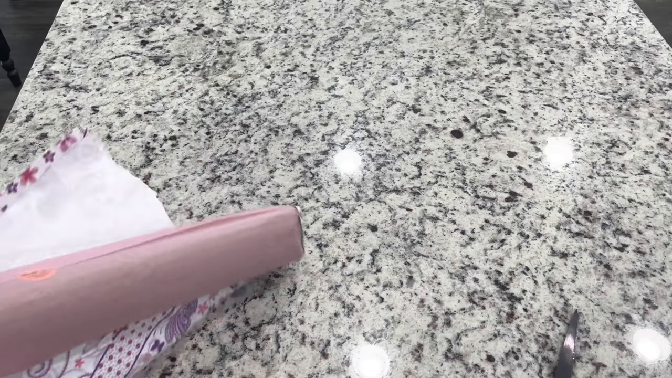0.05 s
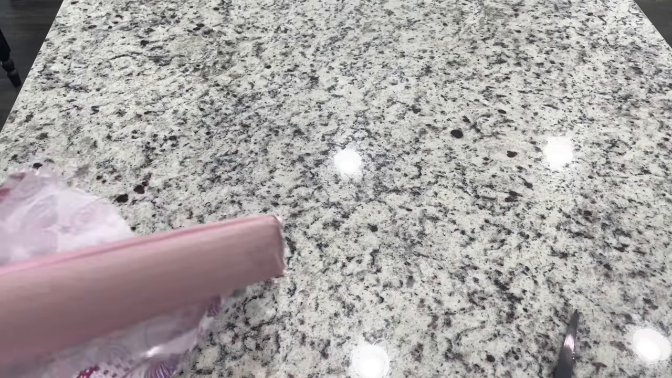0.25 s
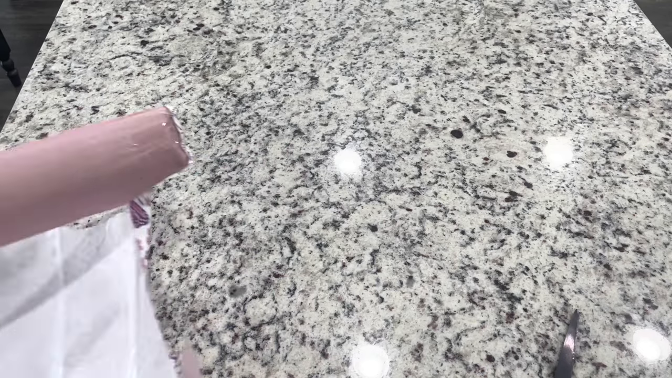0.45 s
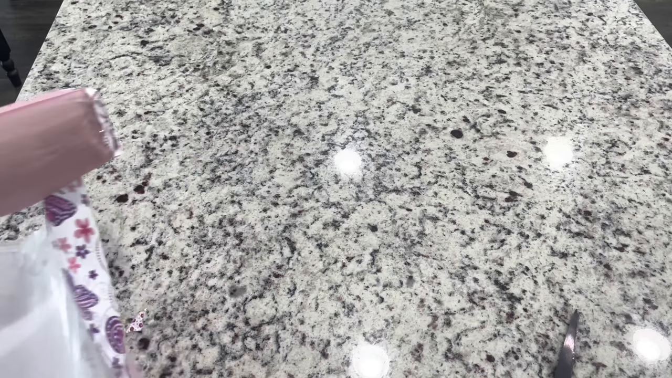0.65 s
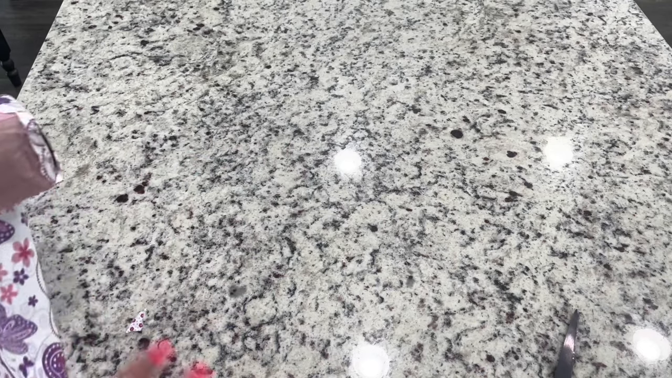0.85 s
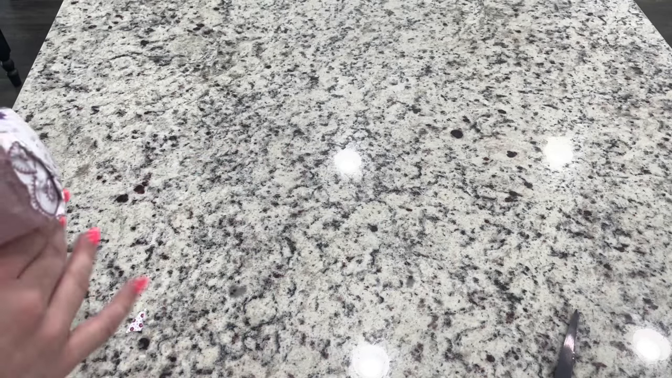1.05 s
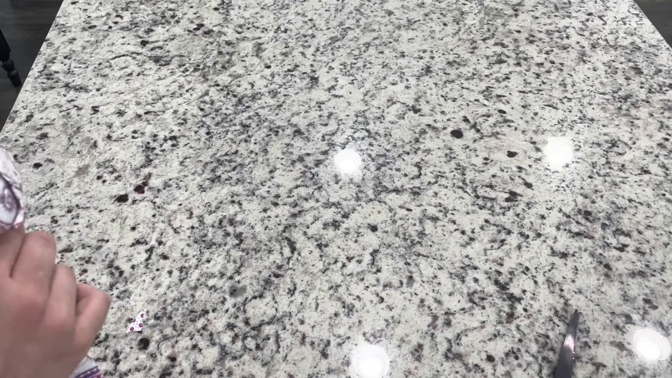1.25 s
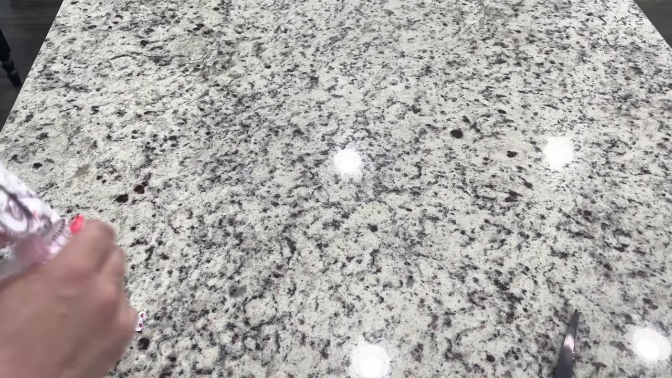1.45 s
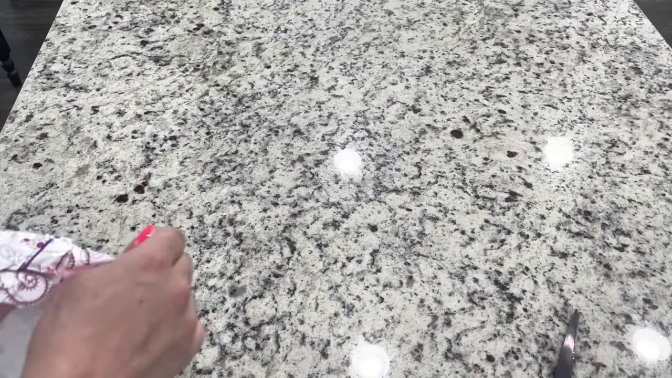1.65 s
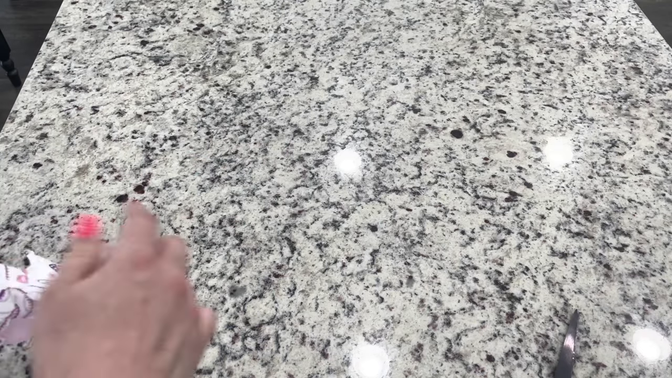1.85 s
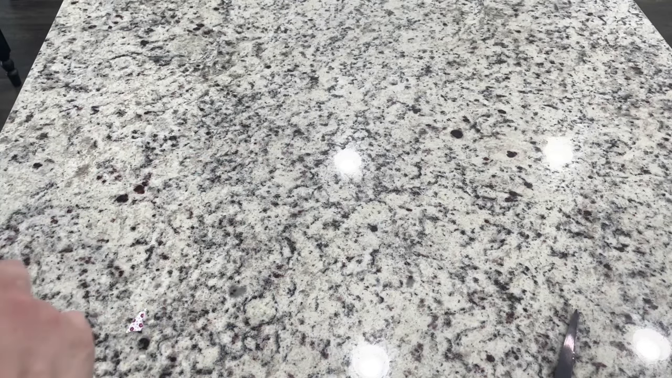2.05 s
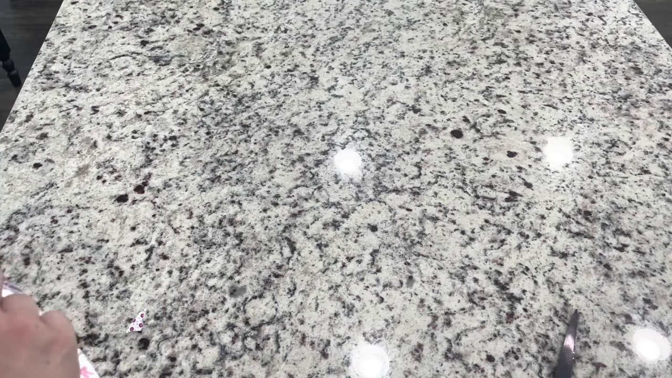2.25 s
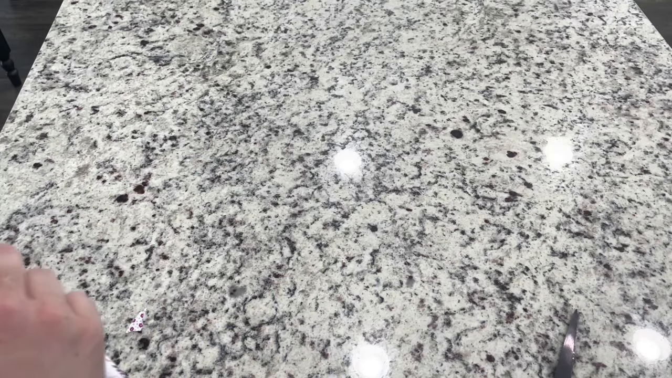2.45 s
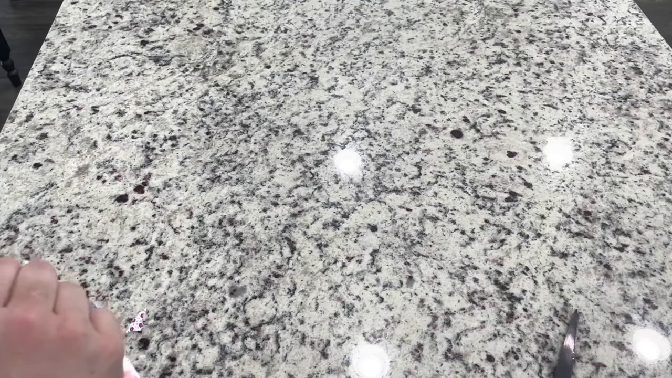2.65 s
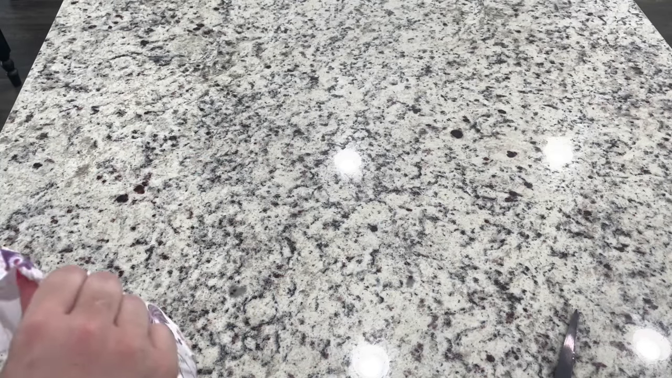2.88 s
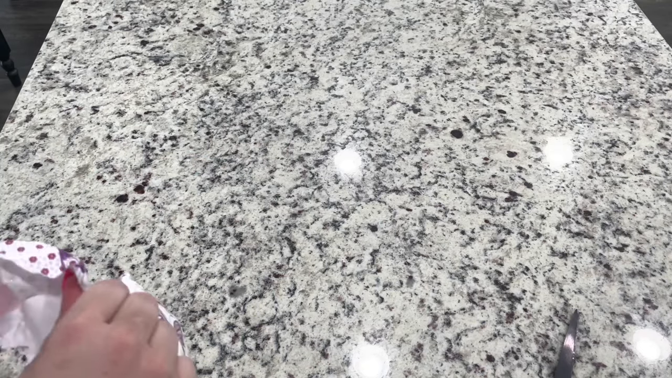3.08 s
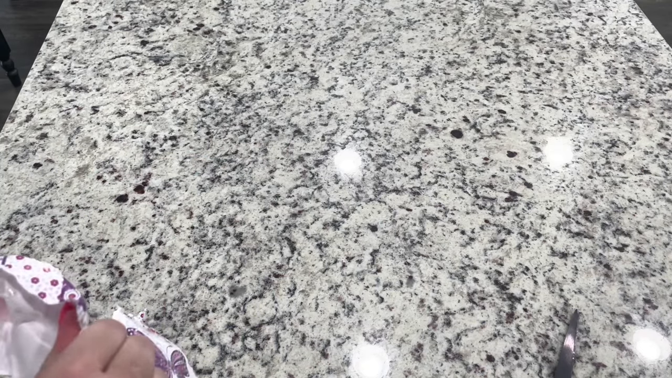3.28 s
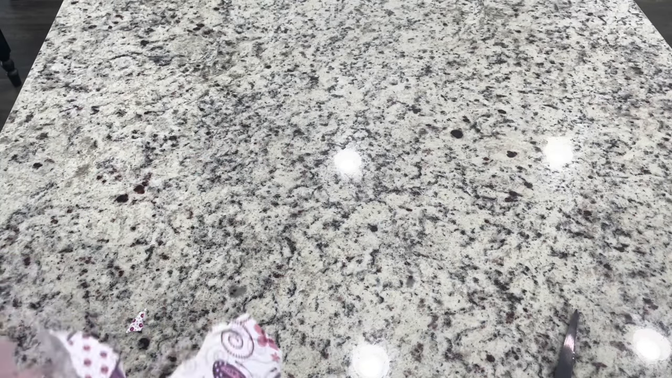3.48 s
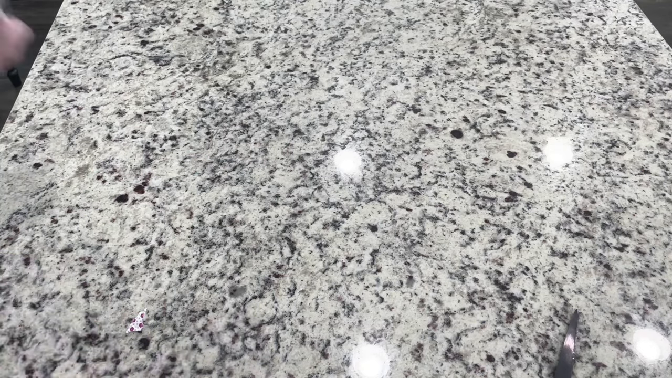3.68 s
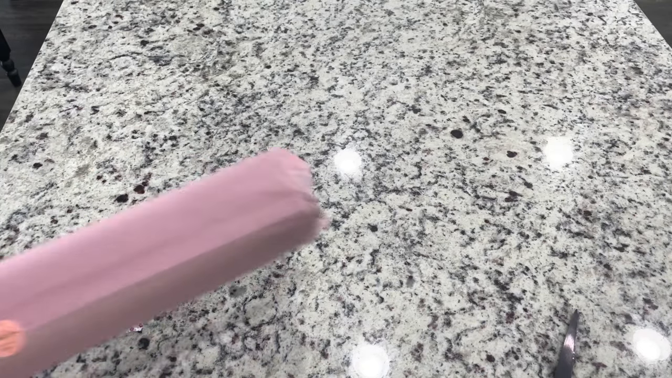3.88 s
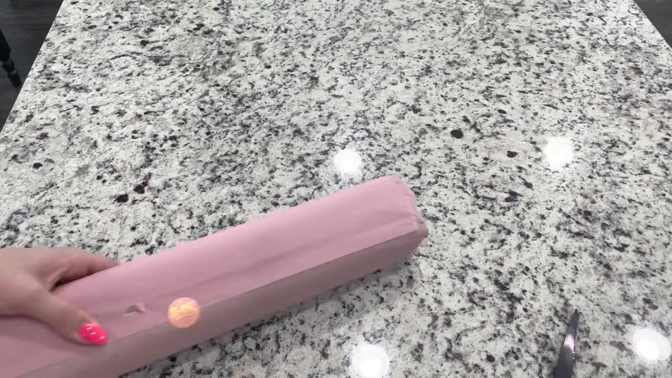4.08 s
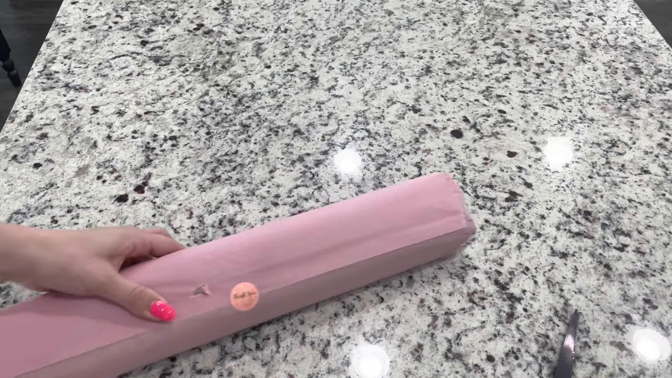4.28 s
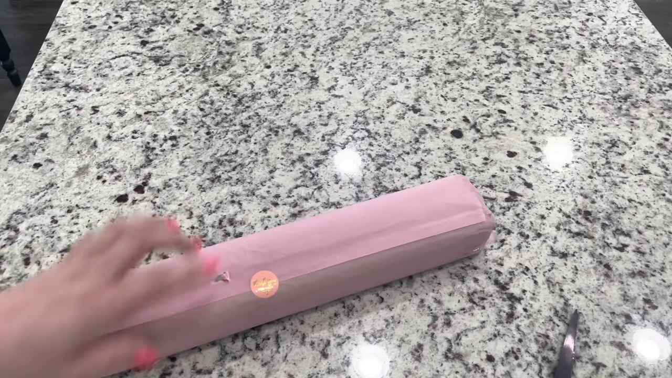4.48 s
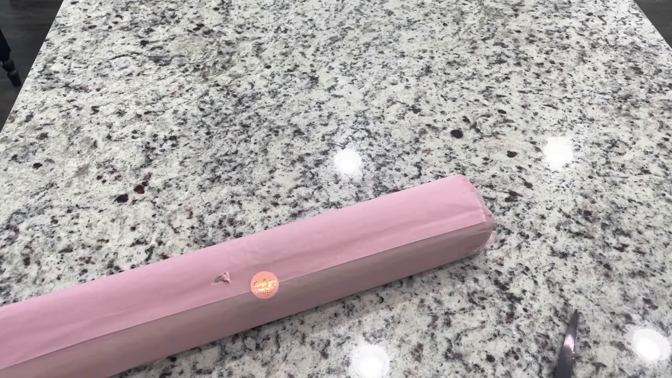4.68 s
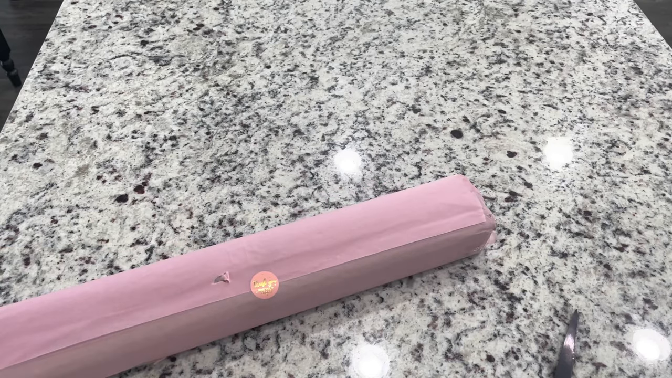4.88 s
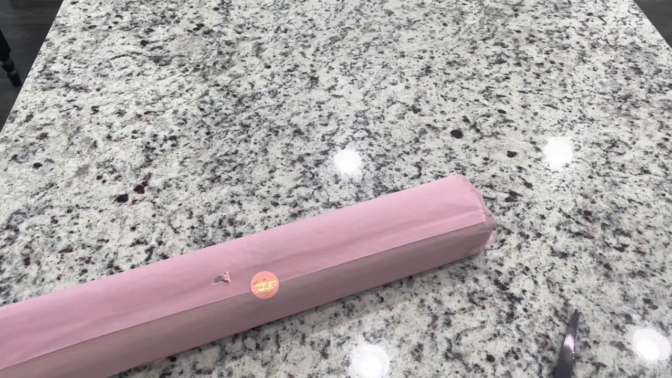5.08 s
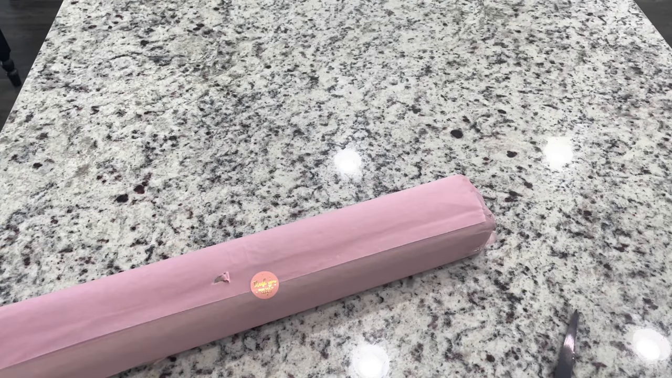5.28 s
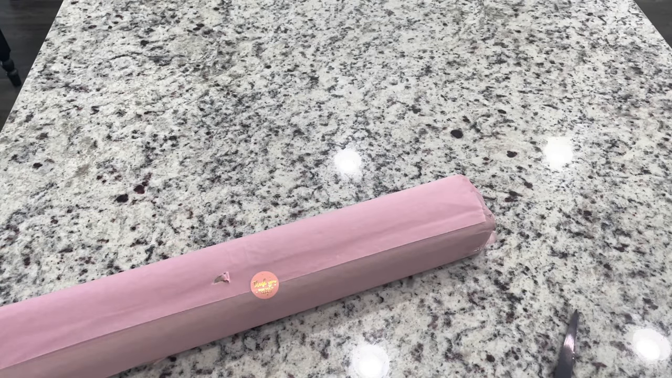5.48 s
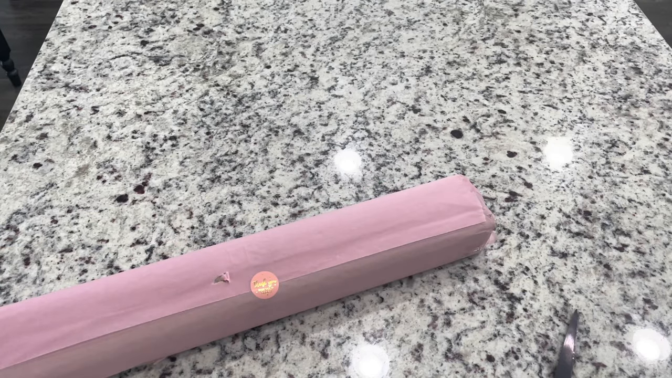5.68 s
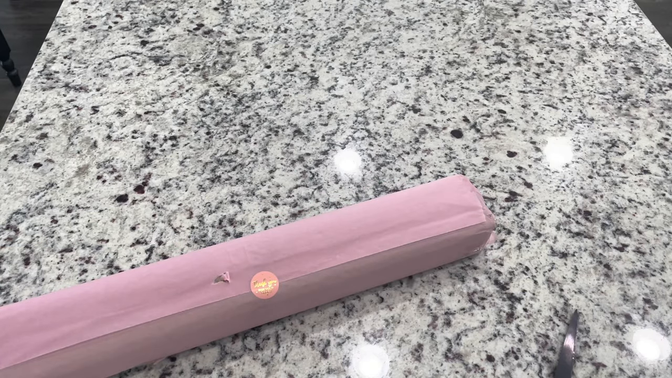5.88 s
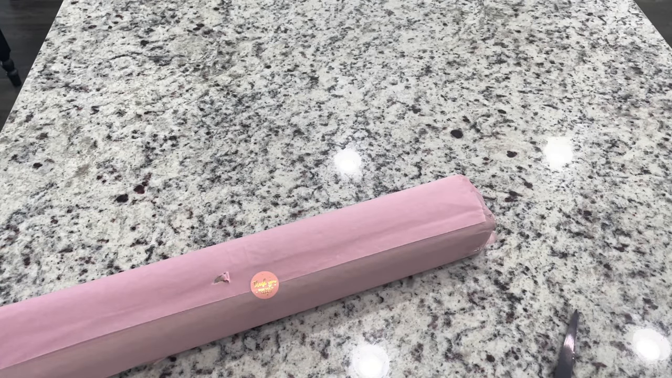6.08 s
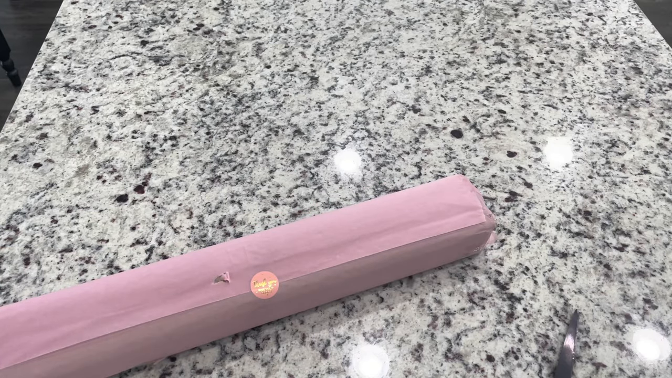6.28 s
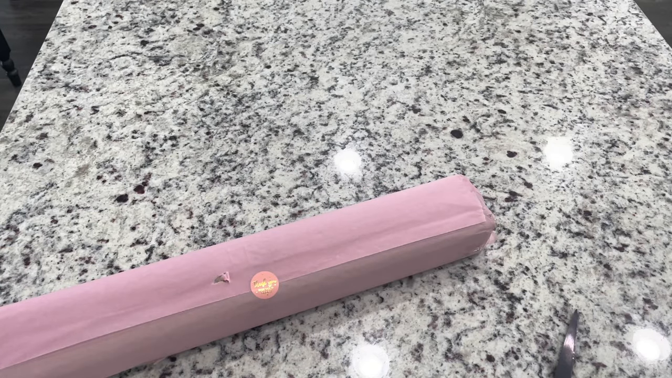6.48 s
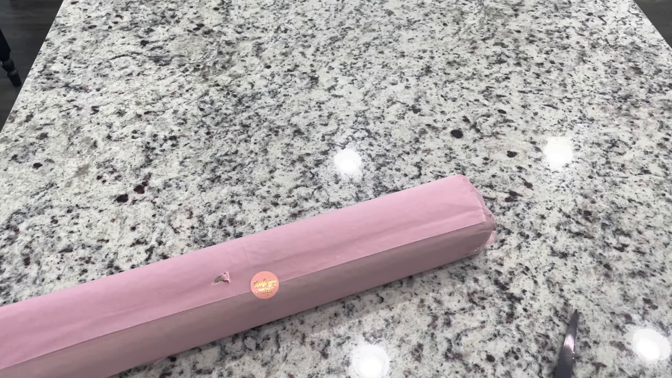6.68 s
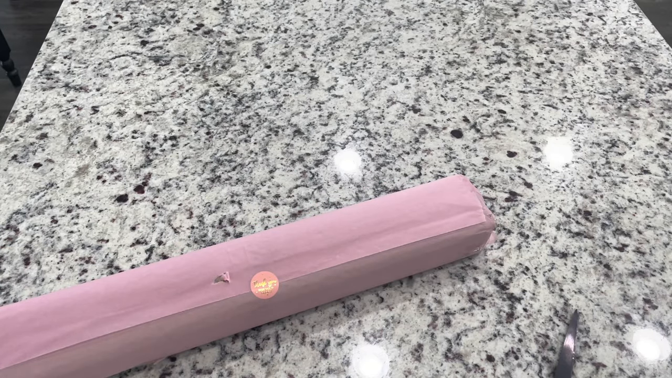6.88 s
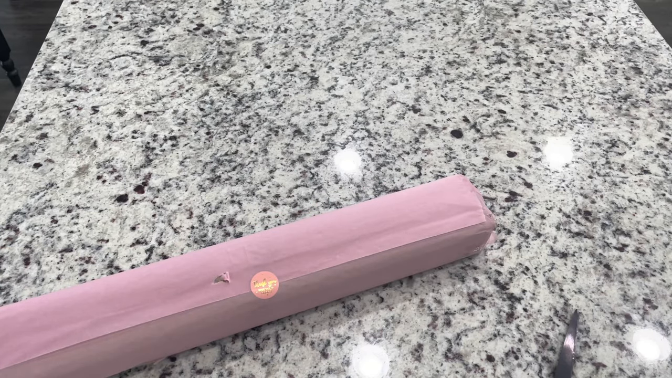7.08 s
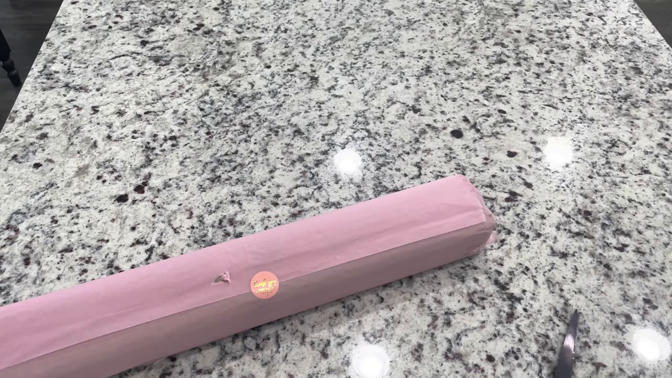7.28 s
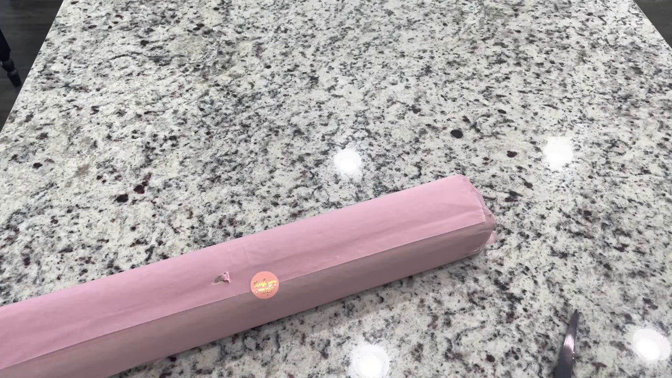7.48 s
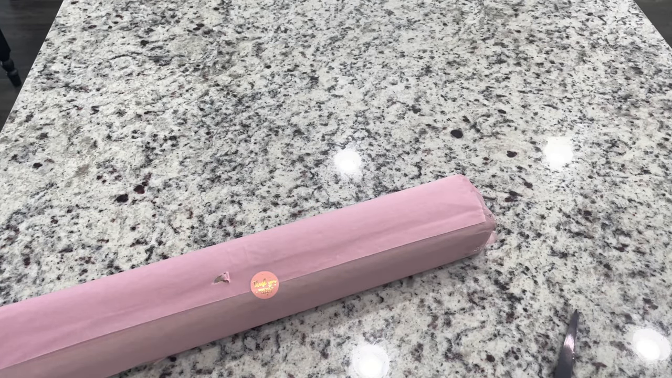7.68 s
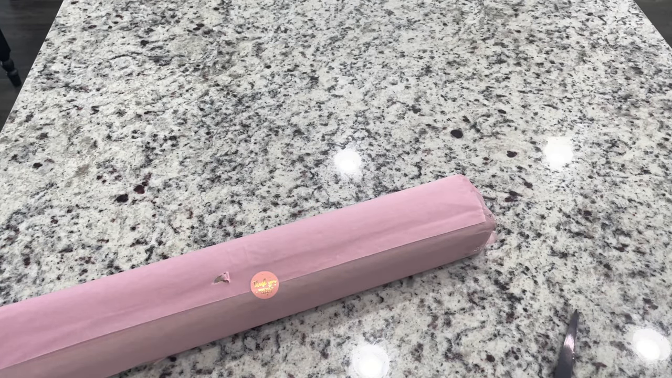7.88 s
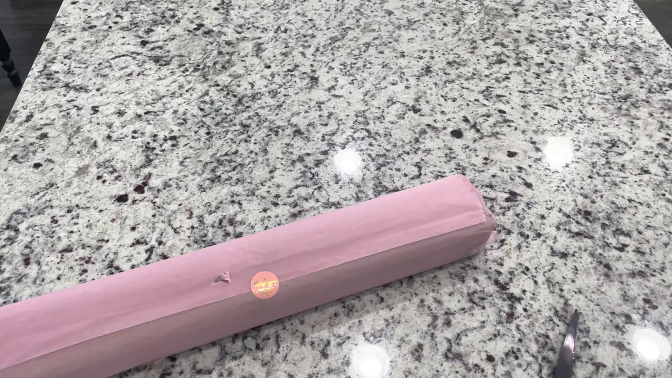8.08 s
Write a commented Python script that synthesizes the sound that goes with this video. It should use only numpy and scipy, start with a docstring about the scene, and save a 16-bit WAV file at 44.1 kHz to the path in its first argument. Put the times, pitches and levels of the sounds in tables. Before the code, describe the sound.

Close in a quiet room, hands pull and crumple wrapping paper over a stone counter. Uneven bursts of crackle and sliding hiss carry sharp snaps and small hollow pops, busiest around three seconds. After a brief lull, the rustling turns softer and duller as the balled paper is taken away, with low soft bumps. It dies to a faint room rumble, with two barely audible blips at the end.

```python
"""Crumpling of wrapping paper

Wrapping paper is pulled off a long package and crumpled by hand over a stone counter in a quiet room.
Buckling creases are random clicks over sliding hiss; single snaps are millisecond noise bursts.
Panels pop as damped sines, rubs are bands of noise, and later the ball of paper is carried off and
dropped, with low damped bumps. Low noise rumbles throughout; two faint pitched blips come last.
A close pair of microphone ports hears the paper with differences of level, phase and likeness."""
import sys
import numpy as np
from scipy import signal
from scipy.fft import rfft, irfft, next_fast_len
from scipy.io import wavfile
from scipy.ndimage import uniform_filter1d

SR = 44100
rng = np.random.default_rng(int(sys.argv[2]) if len(sys.argv) > 2 else 0)


def dump(signal):
    """Clip the signal to [-1, 1] and save it as 16-bit WAV at the path in sys.argv[1]."""
    limited = np.clip(np.atleast_2d(signal).T, -1, 1)
    pcm = np.round(limited * 32767).astype(np.int16)
    wavfile.write(sys.argv[1], SR, pcm)


N = 358974

# low rumble of the room and of the moving arms: [t/s, level/dB]
RUMBLE_LEVEL = [(0, -66), (.09, -40), (.34, -55.5), (1.65, -49.5), (2.2, -61), (3.47, -50), (3.9, -57.5),
                (4.2, -53.5), (4.6, -67), (4.8, -45), (5.3, -62), (6.3, -63.5), (6.85, -64), (7.35, -59),
                (8.14, -62.5)]
# spectrum of the rumble, relative: [f/Hz, density/dB]
RUMBLE_SPECTRUM = [(20, -30.5), (55, 0), (130, -5), (300, -11), (900, -20), (16000, -45)]
# spectral weighting of all paper sounds: [f/Hz, gain/dB]
PAPER_SPECTRUM = [(60, -16.5), (200, -8), (400, -2.5), (1100, -0.5), (1700, -1), (2600, 0.5), (4300, -0.5),
                  (5800, -4), (8500, -1.5), (12000, -4.5), (16500, -4)]
# the two ports: [f/Hz, likeness/1 (0 to 1), excess of left/dB]
PORT_PAIR = [(60, 0.95, -1), (250, 0.8, 1.5), (1192, 0.51, 4), (2460, 0, 3), (4700, 0.98, 5.5),
             (5720, 0, 5), (6950, 0.9, 0.5), (8630, 0.94, 0.5), (11600, 0.5, -1), (13600, 1, 0)]
# phase by which the left port leads: [f/Hz, phase/rad]
PORT_LEAD = [(0, 0), (430, 1), (2000, 2.3), (2850, .2), (4700, .9), (5600, -.1), (7200, -1.8), (8500, -3.1),
             (13100, -6.28)]
# separate pulls and squeezes: [peak t/s, level/dB, swell over 20 dB/s, fade over 20 dB/s]
SQUEEZES = [(0.1, -30, 0.052, 0.37), (0.3, -23.5, 0.34, 0.0071), (0.7, -37.5, 0.045, 0.26),
            (0.847, -33.5, 0.084, 0.027), (0.983, -36, 0.053, 0.16), (1.188, -37.5, 0.17, 0.16),
            (1.327, -27, 0.017, 0.18), (1.41, -22.5, 0.074, 0.22), (1.679, -28, 0.2, 0.041),
            (1.748, -40.5, 0.14, 0.65), (2.5, -24, 0.026, 0.027), (2.812, -21.5, 0.032, 0.12),
            (3.091, -33.5, 0.2, 0.13), (3.238, -27.5, 0.034, 0.076), (3.384, -25.5, 0.016, 0.14),
            (3.428, -23.5, 0.068, 0.024), (3.7, -45.5, 0.1, 0.046), (4.246, -40, 0.019, 0.032),
            (4.721, -30, 0.023, 0.11), (4.921, -35.5, 0.11, 0.15), (5.163, -33.5, 0.1, 0.14),
            (5.48, -33.5, 0.091, 0.21), (5.79, -29.5, 0.18, 0.32), (6.282, -43, 0.017, 0.11),
            (6.397, -41, 0.034, 0.17), (7.315, -55, 0.012, 0.2), (7.411, -49.5, 0.063, 0.1),
            (7.685, -55, 0.092, 0.18), (8.041, -51.5, 0.069, 0.12)]
# paper in the hands: [t/s, rustle between squeezes/dB, gain of lows/dB, gain of treble/dB]
HANDLING = [(0, -55.5, 8.5, 7.5), (.56, -41.5, 2.5, 2), (.9, -62, 9.5, 4.5), (1.4, -48.5, 1.5, -1),
            (1.7, -61, 5, -2.5), (2.26, -57, 8.5, 2), (2.45, -40, 6, -7), (2.75, -49.5, -3, 4.5),
            (3.45, -41.5, 6, 5.5), (3.6, -56.5, 18, -8.5), (3.95, -58, 7.5, 5.5), (4.4, -50.5, 7, 2.5),
            (4.7, -50.5, 7, -10), (5.04, -40, 9, -5.5), (5.33, -36.5, 6, -2), (5.62, -50.5, 6.5, -7.5),
            (6.0, -35.5, 3.5, -3.5), (6.26, -51.5, 8.5, -6), (6.82, -53.5, -1.5, -10.5),
            (6.92, -60.5, 3, -7), (7.27, -74.5, -15, -2), (8.14, -79, -4, -8)]
# the paper is taken away and its creases blend into the slide: [t/s, extra slide/dB]
AWAY = [(4.7, 0), (5.0, 9)]
# single creases snapping: [t/s, sharp level/dB, dull body relative to sharp/dB]
SNAPS = [(0.016, -15.5, 12), (0.0944, -7, -1), (0.493, -24, -10), (0.508, -15, -26), (0.5833, -22, -9),
         (0.609, -18, -5), (0.636, -11.5, 2.5), (0.69, -25, 0), (0.9692, -16, -1), (1.128, -24, -5),
         (1.145, -17.5, -10), (1.3136, -9.5, 1), (1.624, -17, -10), (1.683, -17, -5), (1.736, -19.5, 10),
         (1.8575, -26, 0), (2.19, -31, -10), (2.4523, -20.5, -8), (2.471, -15, -7.5), (2.506, -13, 0),
         (2.6471, -24, 0), (2.691, -24, -20), (2.7484, -23, -16), (2.764, -12.5, -15.5),
         (2.789, -21.5, -13.5), (2.8397, -11, 2.5), (3.042, -16.5, -22), (3.069, -9, -7.5),
         (3.0839, -10.5, -16.5), (3.0962, -7, 0.5), (3.1853, -5.5, -0.5), (3.234, -9.5, 5),
         (3.3382, -18, -26.5), (3.3527, -19, -8), (3.3709, -7, -5), (3.432, -10, -4), (3.799, -35, 0),
         (4.132, -24, 10), (4.214, -33, 5), (4.242, -27.5, 14), (4.555, -27.5, -5), (4.6158, -21, 8),
         (4.707, -14, -3), (5.164, -15.5, 2), (5.474, -16, -10), (6.2779, -33, -10), (6.3655, -34, -5),
         (7.7484, -38, -5), (7.9335, -46, 0)]
# a panel of the sheet buckles with a short pitched pop: [t/s, starting level/dB, f/Hz]
POPS = [(.508, -22.5, 1190), (.561, -23, 1770), (.638, -19, 1010), (0.728, -29, 1180), (1.128, -23.5, 1050),
        (1.665, -19.5, 820), (1.774, -26, 490), (1.809, -28, 480), (4.508, -33, 1445), (4.554, -33.5, 1340),
        (4.976, -27.5, 526)]
# soft dull rubs on the counter: [t/s, length/s, level/dB, lowest f/Hz, highest f/Hz]
RUBS = [(3.84, .14, -66, 1880, 2120), (4.899, 0.13, -38.5, 294, 980), (5.318, 0.17, -40, 920, 1830),
        (6.357, 0.057, -47, 1000, 2200), (6.916, 0.088, -55.5, 249, 1320), (7.077, 0.45, -70, 1500, 1780)]
# soft low bumps on the furniture: [t/s, level before the swell/dB, f/Hz, T60/s]
BUMPS = [(4.765, -36, 78, 0.26), (4.969, -20.5, 96, 0.085), (6.144, -28, 166.3, 0.28)]
# faint blips: [t/s, level/dB]
BLIPS = [(8.037, -56), (8.089, -60)]

SCATTER_S = 0.0008   # decay constant of the scattering
FLAP_HZ, CRISP_HZ = 1900, 7500   # lows lie below the first, treble above the second
CRACKLES_PER_S, SIZE_SPREAD_DB, CLUMP_DB, SLIDE_DB = 480, 3.8, 5, -0.6
DENSE_FROM_DB, DENSER_PER_DB = -41, 0.46   # above this effort more and more creases buckle at once
CREASE_S, CREASE_LOW_HZ = 0.00063, 650   # decay constant; lowest of the sixteen octave bands
SNAP_S, SNAP_BODY_HZ = 0.001, 970   # decay constant; crossover from dull to sharp
ROOM_T60_S, ROOM_DB, ROOM_DULL_HZ = 0.28, -12.5, 5300
SPOTS, SPOT_SAMPLES = 8, 128
POP_CYCLES = 9   # cycles until 60 dB down
RUB_START_S, RUB_T60_S = 0.0064, 0.44
BLIP_HZ, BLIP_S = 685, 0.02
STOP_HZ = 16274   # 80 dB down from here up


def amp(db):
    """Amplitude ratio is ten to the power of level over twenty."""
    return 10 ** (np.asarray(db) / 20)


def rms_one(x):
    """Division by the root mean square gives unit effective value."""
    return x / np.sqrt(np.mean(x ** 2) + 1e-20)


def in_time(rows):
    """Linear interpolation of each column in time."""
    s, *columns = np.transpose(rows)
    return [np.interp(np.arange(N) / SR, s, c) for c in columns]


def at_hz(rows, hz):
    """Interpolation of each column on a logarithmic frequency axis."""
    f, *columns = np.transpose(rows)
    return [np.interp(np.log(hz + 1), np.log(f), c) for c in columns]


def drift(rate_hz):
    """Slow random fluctuation of spread 1: noise twice through a one-pole low-pass."""
    step = 40   # samples between computed points
    r = np.exp(-2 * np.pi * rate_hz * step / SR)
    noise = rng.standard_normal(N // step + 2002)
    slow = signal.lfilter([1], [1, -2 * r, r * r], noise)[2000:]   # settled part only
    return np.interp(np.arange(N) / step, np.arange(len(slow)), rms_one(slow))


def cut(x, hz, kind, order=2):
    """Butterworth filtering: a maximally flat pass band."""
    return signal.sosfilt(signal.butter(order, hz, kind, fs=SR, output="sos"), x)


def smooth_cut(x, hz):
    """Zero-phase low-pass: filtering both ways cancels delay, so bands can be subtracted."""
    return signal.sosfiltfilt(signal.butter(3, hz, fs=SR, output="sos"), x)


def dying_noise(tau_s, count):
    """Exponential decay: noise bursts with time constant tau, energy 1 each."""
    t = np.arange(2048) / SR
    burst = rng.standard_normal((count, len(t))) * np.exp(-t / tau_s)
    return burst / np.sqrt(np.sum(burst ** 2, axis=1, keepdims=True))


def ports(whole, sources, spectrum):
    """Partial coherence: a direct wave common to both ports plus each part's scatter off hands and counter."""
    size = next_fast_len(N + 4096)
    hz = np.arange(size // 2 + 1) * SR / size
    alike, left_db = at_hz(PORT_PAIR, hz)
    alike = np.clip(alike, 0, 1)
    lead = np.interp(hz, *np.transpose(PORT_LEAD))
    side = np.array([[1], [-1]])   # left, right
    scattered = 0
    for source in sources:
        wave = rfft(source, size)
        path = rfft(dying_noise(SCATTER_S, count=2), size)
        scattered = scattered + wave * path / np.abs(path)   # a smear in time that leaves the colour alone
    direct = rfft(whole, size) * np.exp(0.5j * side * lead)
    heard = np.sqrt(alike) * direct + np.sqrt(1 - alike) * scattered
    gain_db = at_hz(spectrum, hz)[0] + 0.5 * side * left_db
    return irfft(heard * amp(gain_db), size)[:, :N]


def rumble():
    """Low-frequency random noise: four independent parts with a slowly wandering level."""
    air = rng.standard_normal((4, N))
    level_db = in_time(RUMBLE_LEVEL)[0] + 2.3 * drift(11.0)
    return amp(level_db) * rms_one(ports(air.sum(axis=0), air, RUMBLE_SPECTRUM))


def effort():
    """Addition of powers, in dB: each squeeze swells ever slower and fades evenly, over the handling."""
    t = np.arange(N) / SR
    power = amp(2 * in_time(HANDLING)[0])
    for s, level_db, swell, fade in SQUEEZES:
        before = np.maximum((s - t) / swell, 0)
        after = np.maximum((t - s) / fade, 0)
        power = power + amp(2 * (level_db - 20 * before ** 2 - 20 * after))
    return 10 * np.log10(power)


def creases(clicks):
    """Impulse response: clicks excite creases of sixteen sizes, each strongest in an octave of its own."""
    dealt, out = rng.integers(0, 16, N), 0
    for k, burst in enumerate(dying_noise(CREASE_S, count=16)):
        low_hz = CREASE_LOW_HZ * 2 ** (k / 4)
        tinted = burst + 2.0 * cut(burst, [low_hz, 2 * low_hz], "band", order=1)
        out = out + signal.oaconvolve(clicks * (dealt == k), tinted[:256])[:N]
    return rms_one(cut(out, 1100, "high", order=1))   # a crease is too small to move low air


def crackle():
    """Random buckling in clumps, over sliding hiss; big sheets flap low, tight crumpling is crisp."""
    _, flap_db, crisp_db = in_time(HANDLING)
    sizes_db = SIZE_SPREAD_DB * np.minimum(rng.exponential(1, N), 4)
    sizes = amp(sizes_db) * rng.choice([-1, 1], N)
    level_db = effort()
    per_s = CRACKLES_PER_S * amp(DENSER_PER_DB * np.maximum(level_db - DENSE_FROM_DB, 0))
    born = rng.random(N) < per_s * amp(CLUMP_DB * drift(40)) / SR
    crackles = creases(sizes * born / np.sqrt(per_s))   # denser clicks are weaker
    slide = amp(SLIDE_DB + in_time(AWAY)[0])
    hiss = amp(0.5 * drift(60)) * rng.standard_normal(N)
    rustle = (crackles + slide * hiss) / np.sqrt(1 + slide ** 2)
    low, below_crisp = smooth_cut(rustle, FLAP_HZ), smooth_cut(rustle, CRISP_HZ)
    middle, treble = below_crisp - low, rustle - below_crisp
    return amp(level_db) * (amp(flap_db) * low + middle + amp(crisp_db) * treble)


def snaps():
    """Sudden release: a crease lets go in about a millisecond; the sheet answers with a duller, longer flick."""
    out = np.zeros(N + 2048)
    sharp = cut(dying_noise(SNAP_S, count=len(SNAPS)), SNAP_BODY_HZ, "high", order=1)
    dull = cut(dying_noise(7.5 * SNAP_S, count=len(SNAPS)), SNAP_BODY_HZ, "low")
    unit = np.sqrt(SNAP_S * SR / 2)   # from unit energy to unit starting level
    for (s, level_db, body_db), a, b in zip(SNAPS, sharp, dull):
        i = round(s * SR)
        out[i:i + 2048] += amp(level_db) * unit * (a + amp(body_db) * b)
    return out[:N]


def room(x):
    """Reverberation: the walls answer after 4 ms with a dull tail of dying noise."""
    t = np.arange(SR // 2) / SR
    tail = cut(rng.standard_normal(len(t)), ROOM_DULL_HZ, "low", order=1)
    tail = tail * amp(-60 * t / ROOM_T60_S) * (t > 0.004)
    return amp(ROOM_DB) * signal.fftconvolve(x, tail / np.sqrt(np.sum(tail ** 2)))[:N]


def wandering(paper):
    """Moving source: the sound passes at random among spots of the sheet every few ms, at constant power."""
    turns = N // SPOT_SAMPLES + 1
    chosen = rng.integers(0, SPOTS, turns) == np.arange(SPOTS)[:, None]
    dealt = np.repeat(chosen * rng.choice([-1., 1.], turns), SPOT_SAMPLES, axis=1)[:, :N]
    blend = uniform_filter1d(dealt, size=SPOT_SAMPLES // 2, axis=1)
    return paper * np.sign(blend) * np.sqrt(np.abs(blend))


def pops():
    """Damped oscillation: a panel rings a few cycles at its own pitch, with an inharmonic overtone."""
    t, out = np.arange(2048) / SR, np.zeros(N + 2048)
    for s, level_db, hz in POPS:
        i = round(s * SR)
        ring = np.sin(2 * np.pi * hz * t) + 0.33 * np.sin(2 * np.pi * 1.7 * hz * t)
        out[i:i + 2048] += amp(level_db - 60 * t * hz / POP_CYCLES) * ring
    return out[:N]


def rubs():
    """Friction noise: uneven bands that start quickly, last a moment and die away."""
    t, out, uneven = np.arange(N) / SR, np.zeros(N), amp(0.59 * drift(30))
    for s, length, level_db, low_hz, top_hz in RUBS:
        start = np.clip((t - s) / RUB_START_S, 0, 1)
        fade_db = -60 * np.maximum(t - s - length, 0) / RUB_T60_S
        band = rms_one(cut(rng.standard_normal(N), [low_hz, top_hz], "band"))
        out += start * amp(level_db + fade_db) * uneven * band
    return out


def bumps():
    """Damped resonance: each bump swells, then rings at a low pitch with a dull thud around it."""
    t, out = np.arange(N) / SR, np.zeros(N)
    thud = rms_one(cut(rng.standard_normal(N), 246, "low", order=4))
    for s, level_db, hz, t60 in BUMPS:
        age = np.maximum(t - s, 0)
        swell = 1 - np.exp(-age / 0.022)
        out += amp(level_db - 60 * age / t60) * swell * (np.sin(2 * np.pi * hz * age) + 0.5 * thud)
    return out


def blips():
    """Gated pure tone: two short soft blips of one pitch under half-sine envelopes."""
    t = np.arange(N) / SR
    shape = sum(amp(db) * np.sin(np.pi * np.clip((t - s) / BLIP_S, 0, 1)) for s, db in BLIPS)
    return shape * np.sin(2 * np.pi * BLIP_HZ * t)


def scene():
    """Superposition: paper and its reverberation at the two ports, with rumble, bumps and blips added."""
    paper = crackle() + snaps() + pops() + rubs()
    paper = paper + room(paper)
    return ports(paper, wandering(paper), PAPER_SPECTRUM) + rumble() + bumps() + blips()


def record(dry):
    """Band limitation: a steep low-pass removes the top."""
    return signal.sosfilt(signal.cheby2(16, 80, STOP_HZ, fs=SR, output="sos"), dry)


dry = scene()
out = record(dry)
dump(out)
```